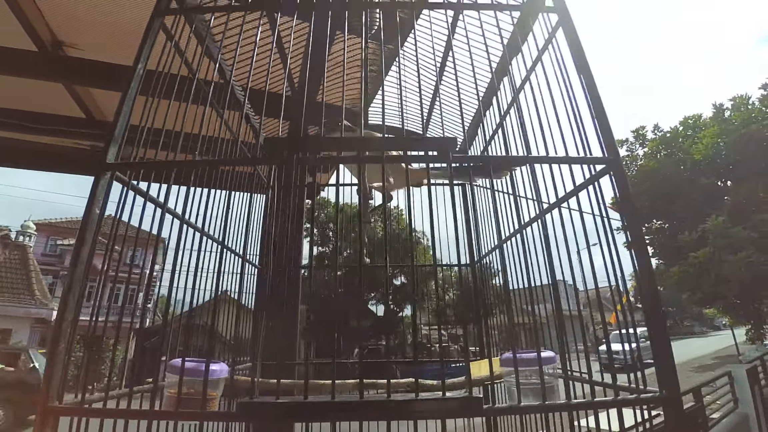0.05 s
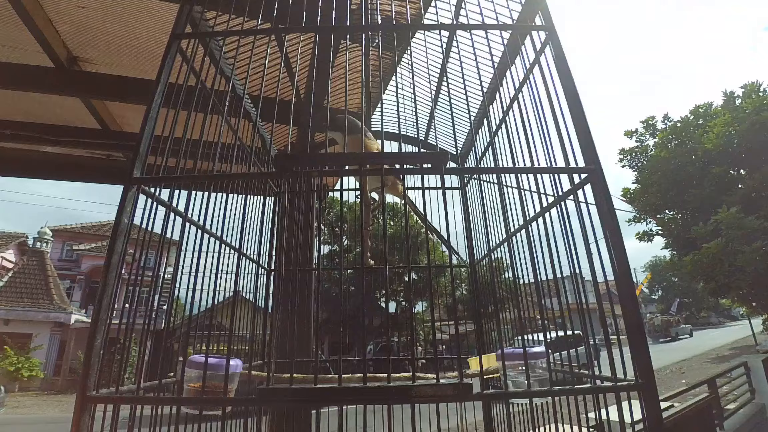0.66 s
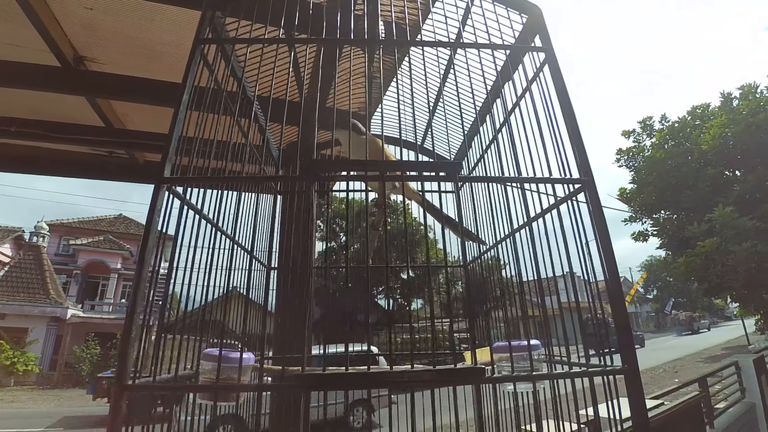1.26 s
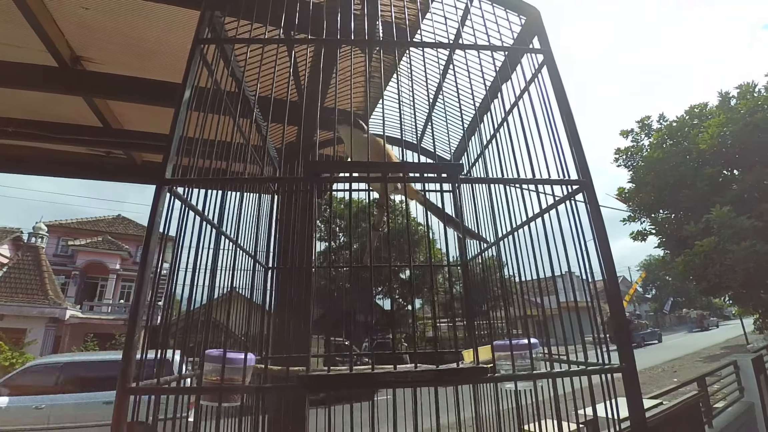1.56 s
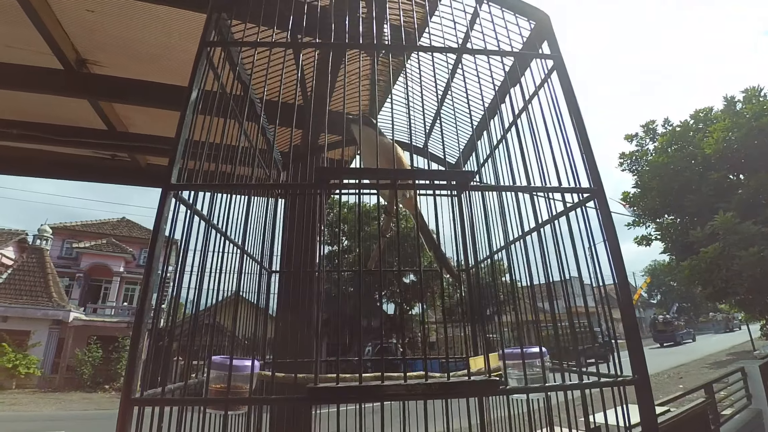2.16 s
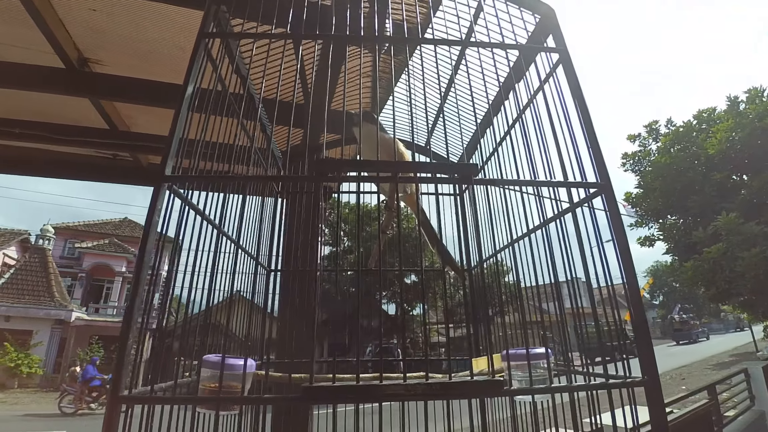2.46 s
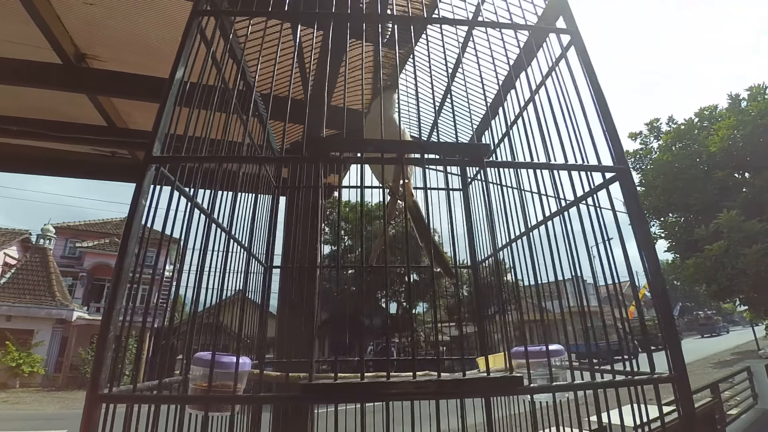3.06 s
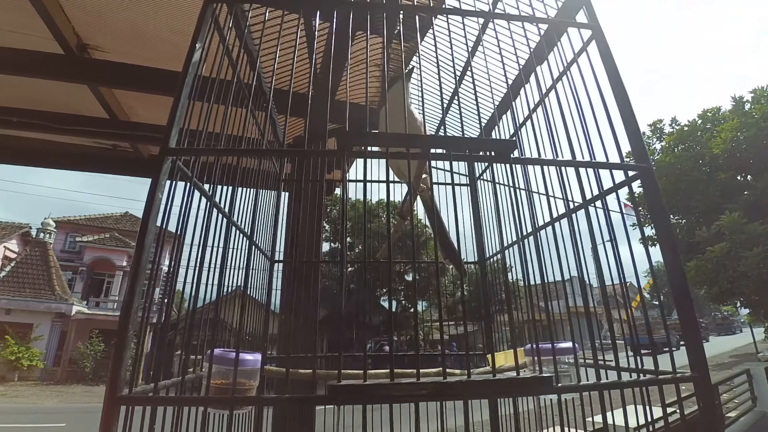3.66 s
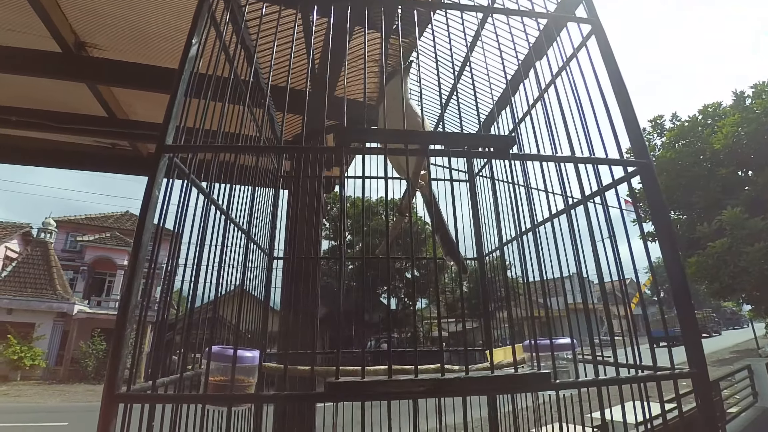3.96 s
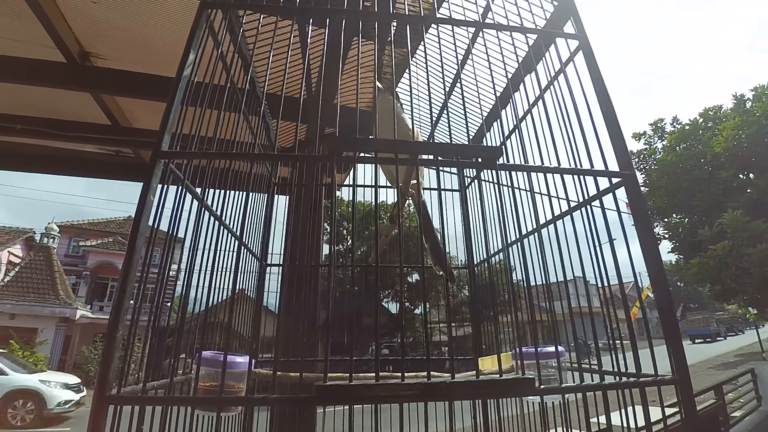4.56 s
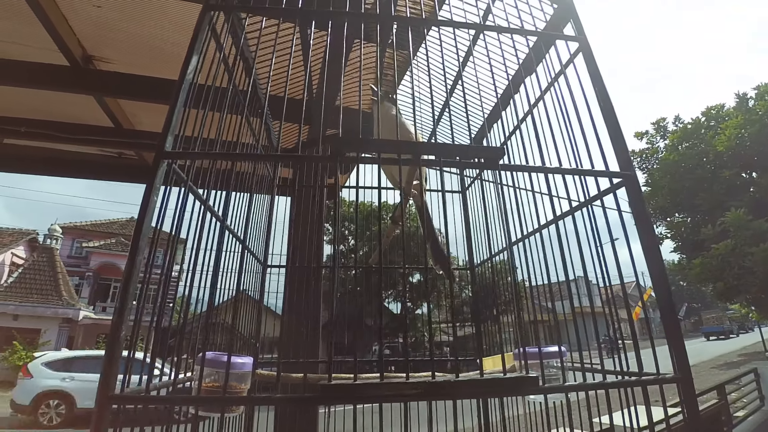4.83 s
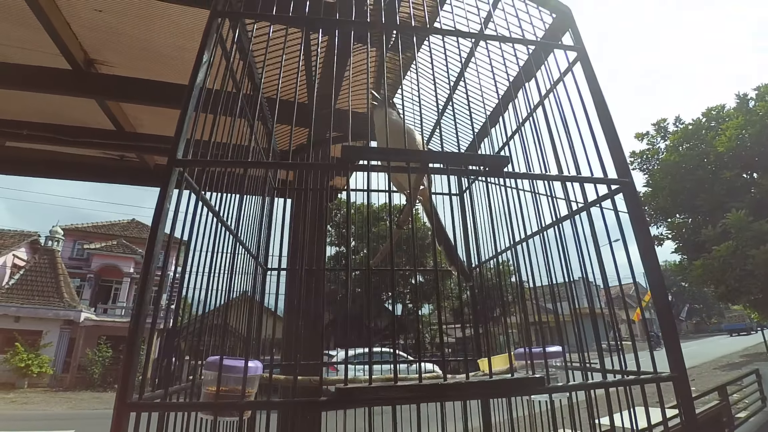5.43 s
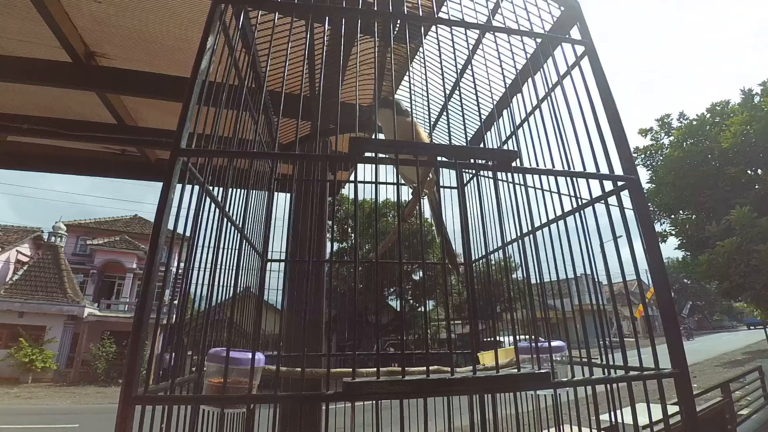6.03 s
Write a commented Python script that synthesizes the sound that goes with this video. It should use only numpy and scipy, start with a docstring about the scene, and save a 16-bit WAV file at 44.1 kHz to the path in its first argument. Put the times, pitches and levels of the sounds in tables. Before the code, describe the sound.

A caged bird calls close by under a porch beside a road, its voice loud, high and sharp with a slight short echo. Each whistled call is a very quick three-note burst, an upward sweep followed by two dipping notes. These come at about 0.3, 0.9 and 1.8 seconds. At 2.5 and 3.2 seconds the bird gives two short harsh squawks, each ending in a rising flick. The whistled calls return at about 4.1, 4.8, 5.5 and 6.1 seconds. Cars pass behind throughout with a low exhaust drone and soft tyre noise, strongest in the first two seconds, easing, then swelling more gently between 4 and 4.7 seconds with a faint whine. A few tiny ticks come from the cage in the first second and a half. A distant bird chirps very faintly near 2.4, 4.3 and 5.2 seconds.

```python
"""Under a porch roof beside a village road, a shrike calls close by from a wire cage.
Seven calls are whistles, near-pure tones that sweep upward and then dip twice; two are harsh squawks,
in which both sides of the syrinx sound at once and make sum tones. The porch reflects the calls.
Cars pass behind, with harmonic exhaust drones and broadband tyre noise. A distant bird chirps
faintly, and a few tiny ticks come from the cage."""
import sys
import numpy as np
from scipy import signal
from scipy.fft import rfft, irfft
from scipy.io import wavfile
from scipy.ndimage import uniform_filter1d, minimum_filter1d, map_coordinates

SR = 44100
rng = np.random.default_rng(int(sys.argv[2]) if len(sys.argv) > 2 else 0)


def master_out(mix):
    """Clip the mix to full scale and print it as 16-bit PCM to the path in sys.argv[1]."""
    frames = np.transpose(np.atleast_2d(mix))
    ceiling = np.clip(frames, -1, 1)
    pcm = np.round(ceiling * 32767).astype(np.int16)
    wavfile.write(sys.argv[1], SR, pcm)


N = 277389
TIME = np.arange(N) / SR


def from_db(db):
    """Amplitude ratio: tenfold for every 20 dB."""
    return 10 ** (np.asarray(db) / 20)


def rms_one(x):
    """Normalisation to an rms of 1."""
    return x / np.sqrt(np.mean(x ** 2) + 1e-20)


def level_at(spectrum, hz):
    """Interpolation of a spectrum in dB along a log-frequency axis."""
    known_hz, db = np.transpose(spectrum)
    return np.interp(np.log(hz), np.log(known_hz), db)


def drift(rate_hz):
    """Random modulation: low-passed noise with a spread of 1."""
    pole = np.exp(-16 * np.pi * rate_hz / SR)   # at an eighth of the sample rate
    slow = signal.lfilter([1], [1, -2 * pole, pole * pole], rng.standard_normal(N // 8 + 4002))[4000:]
    return np.interp(np.arange(N) / 8, np.arange(len(slow)), rms_one(slow))


def noise(spectrum):
    """Spectral shaping of white noise, rolling off beyond the spectrum's ends; rms 1."""
    hz = np.maximum(np.fft.rfftfreq(N, 1 / SR), 1)
    rolloff = np.minimum(1, np.minimum(hz / spectrum[0][0], spectrum[-1][0] / hz)) ** 2
    white = rfft(rng.standard_normal(N))
    return rms_one(irfft(white * from_db(level_at(spectrum, hz)) * rolloff, N))


def glide(contours, fade_s):
    """Frequency and amplitude envelopes from contours of (time_s, pitch_hz, level_db), each faded."""
    rows = []
    for contour in contours:
        first, last = contour[0], contour[-1]
        rows += [(s, hz, from_db(db)) for s, hz, db in contour]
        rows += [(first[0] - fade_s, first[1], 0), (last[0] + fade_s, last[1], 0)]
    s, hz, gain = np.transpose(sorted(rows))
    return np.interp(TIME, s, hz), np.sqrt(2) * np.interp(TIME, s, gain)


def phase_of(hz):
    """Phase is the time integral of frequency."""
    return 2 * np.pi * np.cumsum(hz) / SR


def nearness(nearest_s, passing_s):
    """Attenuation with distance: gain 1 when nearest, a half one passing time away."""
    return 1 / (1 + ((TIME - nearest_s) / passing_s) ** 2)


def engine(hz, amplitude, orders_db, unsteady_db=1.5, waver=.0036):
    """Periodic machinery radiates a harmonic series of orders, each slightly unsteady."""
    phase = phase_of(hz * (1 + waver * drift(3.58)))
    return amplitude * sum(from_db(db + unsteady_db * drift(2.6)) * np.sin(k * phase)
                           for k, db in enumerate(orders_db, 1))


def passing(nearest_s, passing_s, hz, slide_hz_per_s, orders_db, **unsteadiness):
    """A moving harmonic source swells and fades with distance while its pitch slides evenly."""
    pitch_hz = hz + slide_hz_per_s * (TIME - nearest_s)
    return engine(pitch_hz, np.sqrt(2) * nearness(nearest_s, passing_s), orders_db, **unsteadiness)


# Road noise spectra: frequency_hz, relative_density_db
RUMBLE = [(20, -4), (35, 3.5), (52, -3), (75, -11), (110, -0.5), (170, -15.5), (260, -70)]
BODY = [(100, -30), (170, 5), (240, -1.5), (350, -1.5), (480, -7.5), (800, -17)]
TYRES = [(280, -26.5), (500, -2), (750, 0), (1100, -2.5), (1600, -5.5), (2300, -9.5), (4000, -27)]
HISS = [(1500, -11.5), (2600, -1.5), (4000, -1.5), (6000, -5.5), (9000, -10.5), (12000, -18), (15500, -29)]
# Passing cars: nearest_s, passing_s, firing_hz, slide_hz_per_s, orders_db, body_db, tyres_db, hiss_db
VEHICLES = [(.4, 1.0, 56.1, -1.5, (-29, -48, -49, -43), -36.5, -32.5, -40.5),
            (1.65, .45, 55.3, -1, (-28, -46, -44), -39, -34.5, -45), (2.2, .8, 123, -1.5, (-40.5,),
            -38.5, -41, -45), (3.0, 1.1, 154.6, -2.2, (-36, -46), -38, -55, -47.5),
            (4.5, .6, 76.6, -.5, (-40.5, -44, -45), -43.5, -39.5, -60), (5.6, .5, 53, -2, (-39, -44),
            -52, -48, -54), (6.4, .6, 79, 2, (-34.5, -48, -48), -47, -42, -44)]


def traffic(rumble_db=-41, flutter_db=.77):
    """Incoherent sources add in power: each car's noise joins the far traffic, under the engine tones."""
    proximity = np.array([nearness(*row[:2]) for row in VEHICLES]) ** 2
    body, tyres, hiss = from_db([row[5:] for row in VEHICLES]).T ** 2 @ proximity
    rumble = from_db(rumble_db) ** 2 * body / body.max()
    bands = ((RUMBLE, -38.5, rumble), (BODY, -42, body), (TYRES, -40, tyres), (HISS, -49, hiss))
    road = np.zeros(N)
    for spectrum, far_db, near_power in bands:
        amplitude = np.sqrt(from_db(far_db) ** 2 + near_power)
        road += noise(spectrum) * amplitude * from_db(flutter_db * drift(4.2))
    return road + sum(passing(*row[:5]) for row in VEHICLES)


# Exhaust of the loudest car: time_s, firing_hz, level_db
EXHAUST = [(0.0, 69.7, -34), (0.12, 67.3, -28), (1.75, 61.8, -23), (3.66, 56.2, -37), (3.74, 54.4, -37),
           (4.16, 53.8, -33), (4.46, 53.5, -43), (4.61, 55.2, -35), (4.7, 54.7, -40)]
# Its harmonics, from the first: relative_db
EXHAUST_ORDERS_DB = (-.8, -21, -24, -19)


def exhaust_drone():
    """An exhaust sounds at the firing frequency and its multiples."""
    return engine(*glide([EXHAUST], fade_s=.1), EXHAUST_ORDERS_DB, unsteady_db=.5)


# Gears of one car: nearest_s, passing_s, pitch_hz, slide_hz_per_s, orders_db
GEARS = (4.45, .5, 766, -10, (-51, -47.5))


def gear_whine():
    """Meshing gears radiate a wavering tone and its octave."""
    return passing(*GEARS, unsteady_db=3, waver=.016)


# Reflections from cage floor, post and roof: delay_s, gain_db
ECHOES = [(.0031, -30.5), (.0083, -13.5), (.0126, -28), (0.0222, -29.5)]


def porch(x, scatter_db=-17, scatter_t60_s=.12, tail_db=-21.5, tail_t60_s=.59):
    """Reverberation: early reflections, scattering from bars and beams, and a faint street tail."""
    t = TIME[:SR]
    response = np.zeros(SR)
    for db, t60_s in ((scatter_db, scatter_t60_s), (tail_db, tail_t60_s)):
        decay = rng.standard_normal(SR) * from_db(-60 * t / t60_s) * (t > .005)
        response += from_db(db) * rms_one(decay) / np.sqrt(SR)
    response = signal.sosfilt(signal.butter(2, 7500, fs=SR, output="sos"), response)
    for delay_s, db in ECHOES:
        response[round(delay_s * SR)] += from_db(db)
    return signal.fftconvolve(x, response)[:N]


# Chirps of a distant bird: start_s, length_s, start_hz, end_hz, relative_db
FAR_CHIRPS = [(2.386, .03, 4500, 4700, -52), (4.30, .03, 4500, 4300, -50), (5.145, 0.028, 4700, 4360, -47),
              (5.158, .035, 5600, 6600, -44), (5.289, 0.036, 5200, 5300, -48)]


def far_chirps(gain_db=2, edge_db=-8):
    """Short sine glides; distance raises the ratio of reverberant to direct sound."""
    contours = [[(start, start_hz, db + edge_db),
                 (start + length / 2, (start_hz + end_hz) / 2, db),
                 (start + length, end_hz, db + edge_db)]
                for start, length, start_hz, end_hz, db in FAR_CHIRPS]
    hz, amplitude = glide(contours, fade_s=.005)
    chirps = from_db(gain_db) * amplitude * np.sin(phase_of(hz))
    return chirps + 2 * porch(chirps)


# Ticks in the cage: start_s, relative_db
TICKS = [(0.2758, -28.5), (0.5726, -32), (0.6165, -27), (0.6357, -30), (0.7013, -28), (0.785, -29.5),
         (1.1279, -24), (1.208, -24), (1.3775, -28.5)]


def cage_ticks(gain_db=-6, decay_s=.0046):
    """Damped transients: bursts of bright band noise with exponential decay."""
    envelope = sum(from_db(db) * np.exp(-np.abs(TIME - s) / decay_s) * (TIME >= s) for s, db in TICKS)
    return from_db(gain_db) * envelope * noise([(4500, -14), (6100, 11), (7200, -12), (11000, -29)])


def treble_gain():
    """Directivity: the voice brightens or dulls as the bird turns its head between calls."""
    turns = [(sweep[0], db) for sweep, _, _, db in WHISTLES] + [(row[0], row[-1]) for row in SQUAWKS]
    return from_db(np.interp(TIME, *np.transpose(sorted(turns))))


# Spectrum of the airy rasp in the voice: frequency_hz, relative_density_db
RASP = [(2000, -10), (4500, 5), (6200, 7), (8500, -17), (11800, 1), (15000, -17)]


def rasp(db):
    """The aperiodic part of the voice: broadband noise."""
    return from_db(db) * noise(RASP)


def squawk_contour(start, length, hz, db, scoop_s, fade_db_per_s=0, hold_s=.066):
    """Pitch and level move together: they scoop up, sag as effort eases and lift at the end."""
    scoop_from_hz, onset_db, attack_s = 2850, -11, .019
    sag_span, sag_share, sag_db = (.2, .8), .092, 7.5   # the span is in shares of the length
    lift_hz, lift_db, lift_s = 220, 2, .005
    t = np.linspace(0, length, num=60)
    sag = (1 - np.cos(np.interp(t / length, sag_span, [0, np.pi]))) / 2
    lift = np.exp((t - length) / lift_s)
    pitch = hz * (1 - sag_share * sag) - (hz - scoop_from_hz) * np.exp(-t / scoop_s) + lift_hz * lift
    level = db + onset_db * np.maximum(1 - t / attack_s, 0) - sag_db * sag + lift_db * lift
    level -= fade_db_per_s * np.maximum(t - hold_s, 0)
    return list(zip(start + t, pitch, level))


def flick_contour(start, db, from_hz=4270, rise_hz_per_s=35000, end_db=-15):
    """A linear chirp: the loud rising whistle that ends a squawk."""
    steps_s = np.cumsum([.002, .010, .009])   # attack, hold, release
    return list(zip(start + steps_s, from_hz + rise_hz_per_s * steps_s, (db, db, db + end_db)))


# Harmonics two to four of the lower voice: relative_db
SQUAWK_HARMONICS_DB = [-6, -17, -28]
# Squawks, levels relative: start_s, length_s, low_hz, low_db, high_hz, high_db, flick_db, treble_db
SQUAWKS = [(2.528, .113, 3660, -11.8, 5550, -17.5, -7.5, 0),
           (3.152, .106, 3610, -9.3, 6000, -16.5, -7.5, 2.7)]


def squawks(low_jitter=.00467, high_jitter=.018, coupling=1.45, lead_s=.013, rasp_db=-27):
    """Biphonation: both sides of the syrinx sound; the lower modulates the upper, adding sum tones."""
    lows, highs = [], []
    for start, length, low_hz, low_db, high_hz, high_db, flick_db, _ in SQUAWKS:
        lows.append(squawk_contour(start, length, low_hz, low_db, scoop_s=.0075))
        # The upper voice starts first and dies early.
        upper = squawk_contour(start - lead_s, length + lead_s, high_hz, high_db,
                               scoop_s=.016, fade_db_per_s=330)
        highs.append(upper + flick_contour(start + length, flick_db))
    low_hz, low_gain = glide(lows, fade_s=.0034)
    high_hz, high_gain = glide(highs, fade_s=.005)
    low_phase = phase_of(low_hz * (1 + low_jitter * drift(400)))
    high_phase = phase_of(high_hz * (1 + high_jitter * drift(295)))
    fundamentals = low_gain * np.cos(low_phase) + high_gain * np.sin(high_phase)
    overtones = sum(from_db(db) * np.cos(k * low_phase) for k, db in enumerate(SQUAWK_HARMONICS_DB, 2))
    sum_tones = np.sin(high_phase + low_phase) + .42 * np.sin(high_phase + 2 * low_phase)
    partials = low_gain * (overtones + coupling * high_gain * sum_tones)
    air = rasp(rasp_db) * (low_gain + np.minimum(high_gain, .15))
    return fundamentals + treble_gain() * (partials + air)


CREST_HZ, CREST_DB, HUSH_DB = 5840, -25, -33   # the soft arcs between notes; the lull after a sweep


def sweep_contour(start, length, hz, db, rise_hz=720, swell_db=13, stop_s=.007):
    """A linear chirp that swells; the push of air stops while the pitch springs on upward."""
    top_hz = hz + rise_hz
    return [(start, hz, db - swell_db),
            (start + length / 2, (hz + top_hz) / 2, db - 4.5),
            (start + length - stop_s / 2, top_hz, db),
            (start + length + stop_s / 2, top_hz + rise_hz / 2, HUSH_DB)]


def dip_contour(start, length, hz, db, falling_share, fall_s=.011, attack_s=.004):
    """Frequency modulation: the note bursts out falling from the crest, bottoms out and creeps up."""
    entry_db, creep_hz, sag_db = -22, 340, 2
    entry_hz = hz + .55 * (CREST_HZ - hz)
    bottom_s = start + falling_share * length
    burst_hz = np.interp(start, [start - attack_s, bottom_s], [entry_hz, hz])
    return [(start - fall_s, CREST_HZ, CREST_DB),
            (start - attack_s, entry_hz, entry_db),
            (start, burst_hz, db - sag_db),
            (bottom_s, hz, db),
            (start + length, hz + creep_hz * (1 - falling_share), db - sag_db)]


# Second harmonic of a whistle: harmonic_hz, relative_db
OVERTONE = [(6500, -28), (8200, -38.5), (9600, -31), (10800, -26.5), (11600, -11)]
# Whistled calls: sweep, first_dip, last_dip, treble_db
# Each note: start_s, length_s, lowest_hz, relative_db; a dip adds falling_share (of its length)
WHISTLES = [((.329, .020, 3570, -13), (.382, .020, 4780, -6.3, .25), (.437, .032, 4940, -12.3, .2), -1.5),
            ((.891, .020, 3450, -13), (.947, .015, 4850, -9, .4), (.993, .049, 5220, -12.3, .2), -2.5),
            ((1.781, .019, 3470, -12.5), (1.834, .021, 4630, -10.5, .3), (1.880, .041, 5050, -15, .85),
            1.5), ((4.051, .020, 3350, -10), (4.103, .020, 4700, -7.5, .2), (4.153, .024, 5130, -12, .7),
            6), ((4.785, .020, 3420, -9.3), (4.838, .022, 4620, -7.5, .15), (4.886, .034, 5070, -12.5, .35),
            1), ((5.457, .016, 3620, -13.5), (5.511, .019, 4620, -7.5, .2), (5.560, .027, 4960, -9.5, .3),
            4.5), ((6.055, .022, 3480, -15), (6.110, .020, 4690, -11.5, .2),
            (6.158, .034, 4960, -15.5, .25), 0)]


def whistles(jitter=.005, crest_jitter=.019, shimmer_db=2.5, second_hz=5650, second_db=-25, rasp_db=-28):
    """Gliding tones with jitter and shimmer; a weak second voice joins the dips. Gives sound and pitch."""
    calls, second_voices = [], []
    for sweep, first, last, _ in WHISTLES:
        hush = (first[0] - .018, CREST_HZ, HUSH_DB)
        crest = (first[0] + first[1] + .006, CREST_HZ, CREST_DB)
        calls.append(sweep_contour(*sweep) + [hush] + dip_contour(*first) + [crest] + dip_contour(*last))
        second_voices.append([(first[0], second_hz, second_db), (last[0] + last[1], second_hz, second_db)])
    hz, gain = glide(calls, fade_s=.004)
    hz = uniform_filter1d(hz, size=130)   # rounds the corners over 3 ms
    shake = jitter + crest_jitter * np.clip((hz - 5200) / 600, 0, 1)
    _, second_gain = glide(second_voices, fade_s=.007)
    main = (hz * (1 + shake * drift(146.4)), gain * from_db(shimmer_db * drift(210)))
    second = (second_hz * (1 + .025 * drift(60)), second_gain * from_db(3 * drift(120)))
    treble = treble_gain()
    tone = np.zeros(N)
    for voice_hz, amplitude in (main, second):
        phase = phase_of(voice_hz)
        overtone = treble * from_db(level_at(OVERTONE, 2 * voice_hz)) * np.sin(2 * phase)
        tone += amplitude * (np.sin(phase) + overtone)
    air = rasp(rasp_db) * treble * np.sqrt(gain) / 2
    return tone + air, hz


def shrike(gain_db=-1, beam_db=2):
    """Beaming: the highest whistled notes are aimed at the roof, so they return with more echo."""
    whistle, hz = whistles()
    squawk = squawks()
    beam = from_db(beam_db * np.clip((hz - 5000) / 800, 0, 1))
    return from_db(gain_db) * (whistle + squawk + porch(beam * whistle + squawk))


def scene():
    """Superposition of the near bird, its cage, the distant bird and the road."""
    return (shrike() + cage_ticks() + far_chirps() + traffic() + exhaust_drone() + gear_whine())[None, :]


def timing_slip(x, rate_hz=1161.7, slip_samples=.93, spread_samples=.21):
    """Phase modulation: sample timing creeps and snaps back, fringing high notes with sidebands."""
    cycles = phase_of(rate_hz * (1 + .008 * drift(100))) / (2 * np.pi)
    sizes = (slip_samples + spread_samples * rng.standard_normal(N))[cycles.astype(int)]
    sawtooth = cycles % 1 - .5
    return map_coordinates(x, [np.arange(N) + sizes * sawtooth], order=3, mode="nearest")


def limit(x, ceiling=.88):
    """Peak limiting: a fast, smoothed gain turns the loudest notes down."""
    gain = minimum_filter1d(ceiling / np.maximum(np.abs(x), ceiling), size=130)
    return x * uniform_filter1d(gain, size=130)


def record(dry, cutoff_hz=15500):
    """Band limiting: a steep low-pass follows the timing slip and the limiter."""
    held = limit(timing_slip(dry[0]))
    lowpass = signal.ellip(12, .1, 90, cutoff_hz, fs=SR, output="sos")
    return signal.sosfilt(lowpass, held)[None, :]


dry = scene()
out = record(dry)
master_out(out)
```